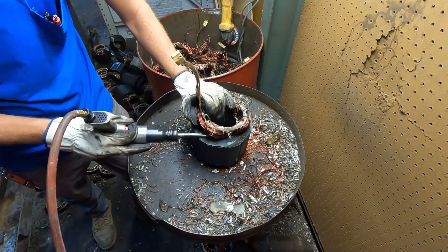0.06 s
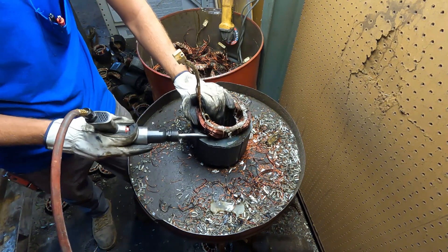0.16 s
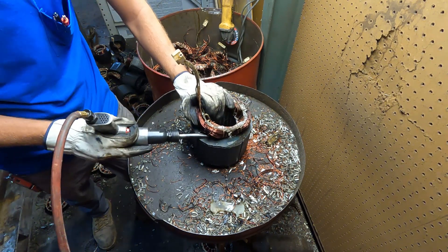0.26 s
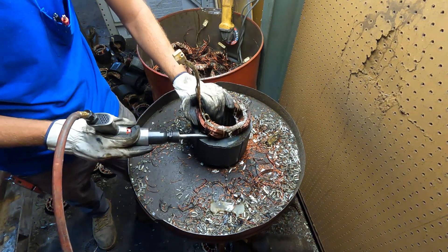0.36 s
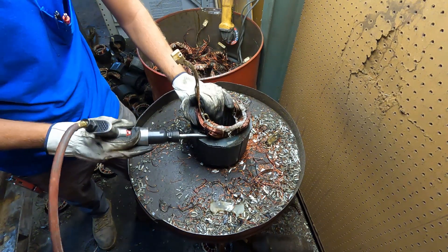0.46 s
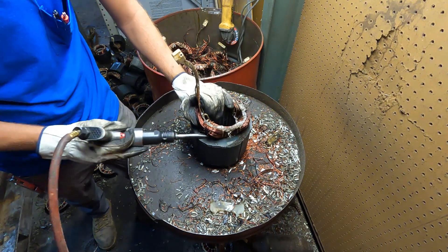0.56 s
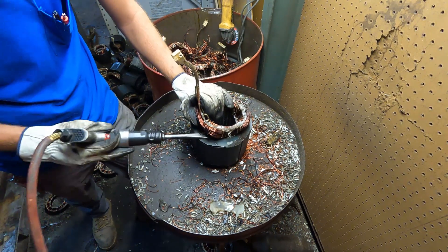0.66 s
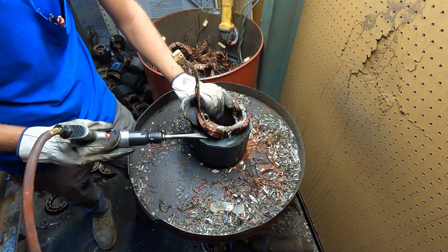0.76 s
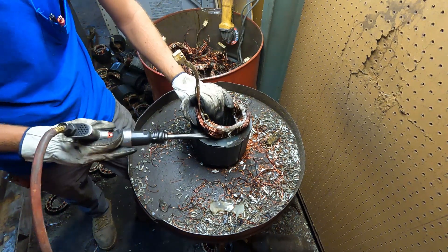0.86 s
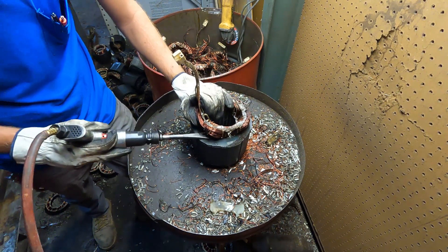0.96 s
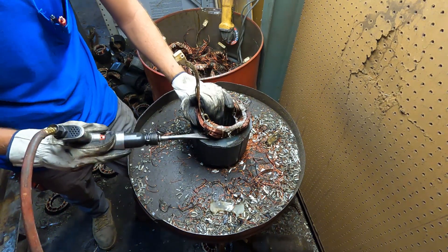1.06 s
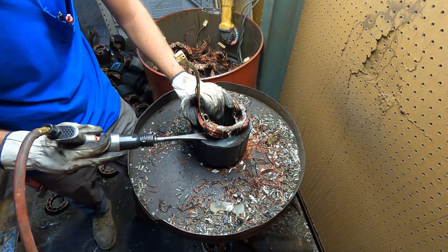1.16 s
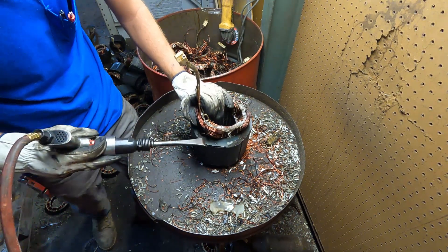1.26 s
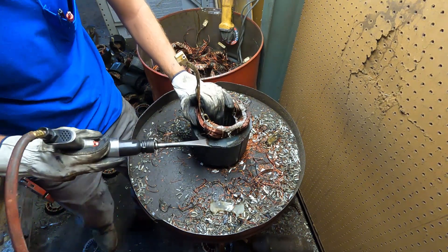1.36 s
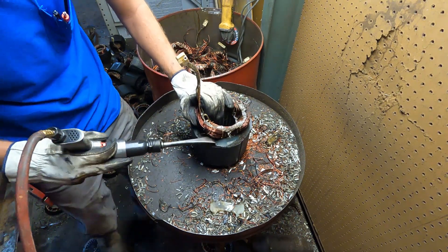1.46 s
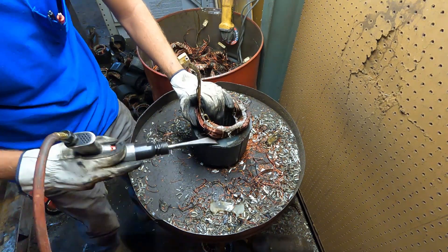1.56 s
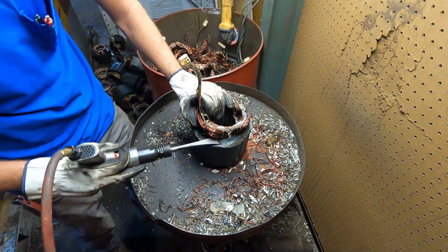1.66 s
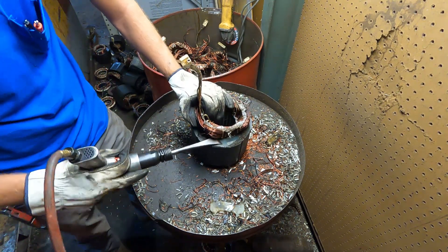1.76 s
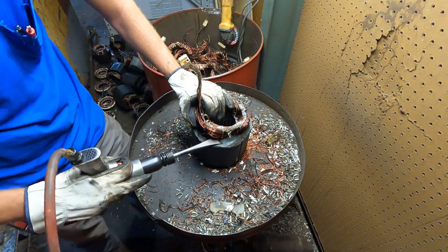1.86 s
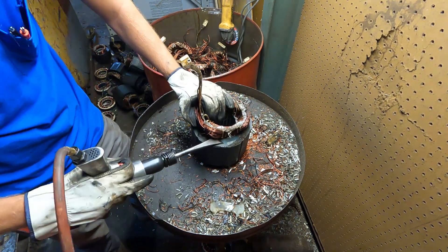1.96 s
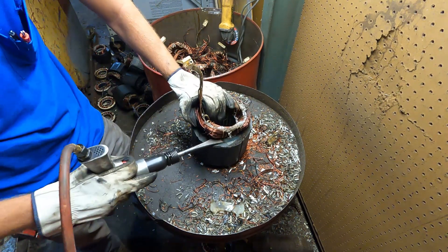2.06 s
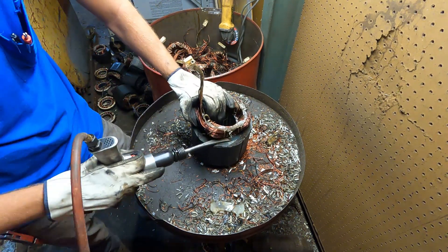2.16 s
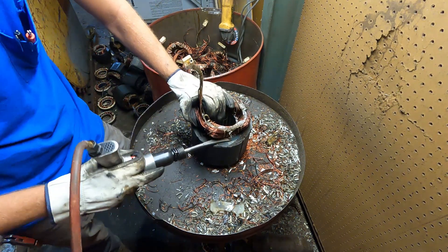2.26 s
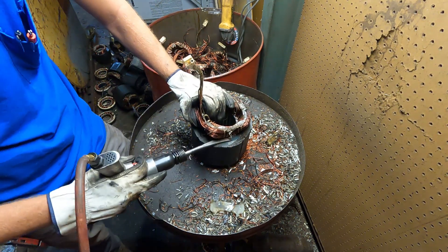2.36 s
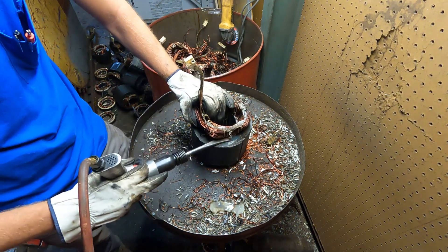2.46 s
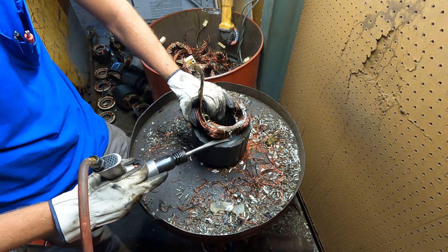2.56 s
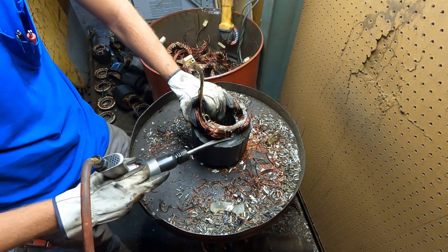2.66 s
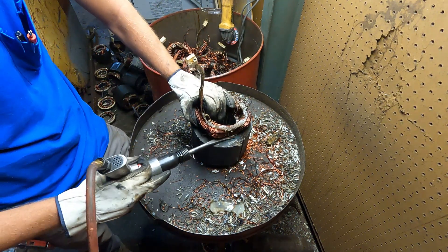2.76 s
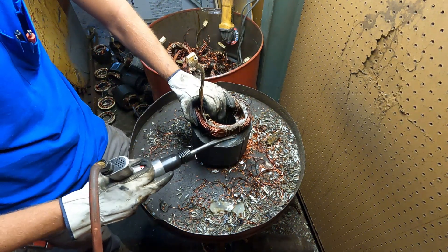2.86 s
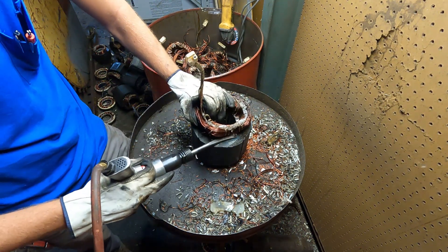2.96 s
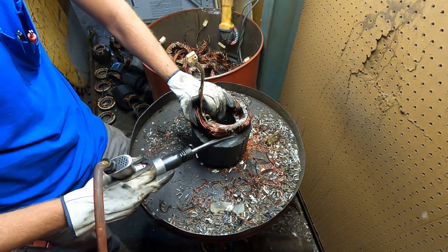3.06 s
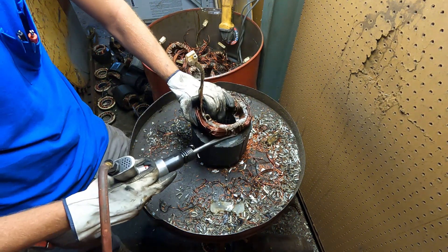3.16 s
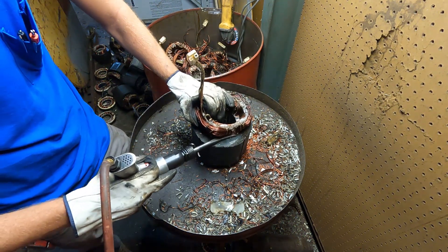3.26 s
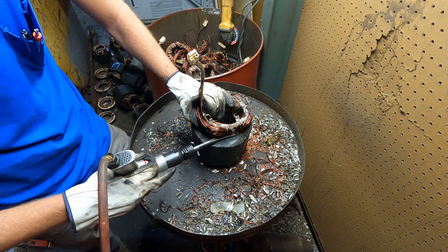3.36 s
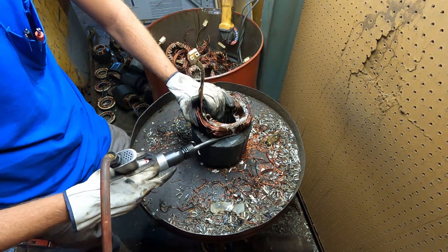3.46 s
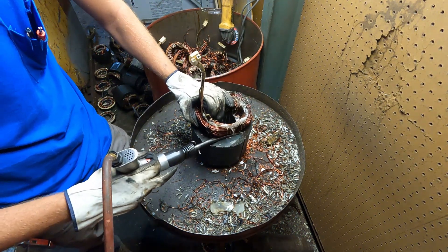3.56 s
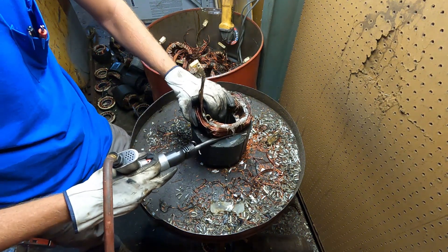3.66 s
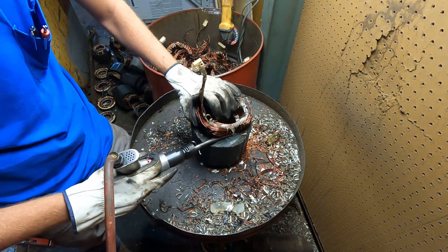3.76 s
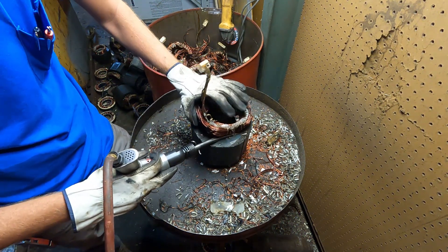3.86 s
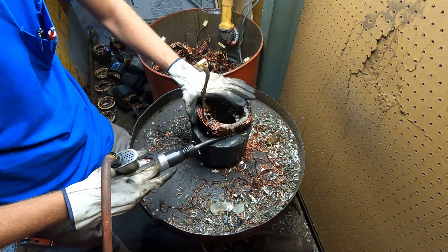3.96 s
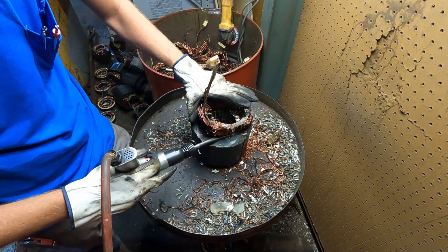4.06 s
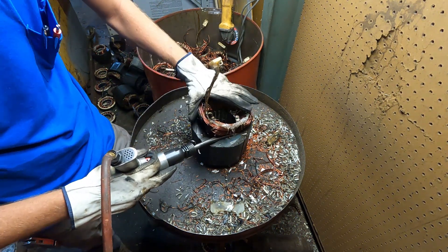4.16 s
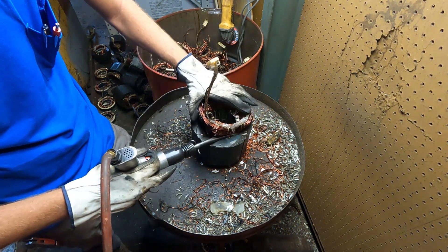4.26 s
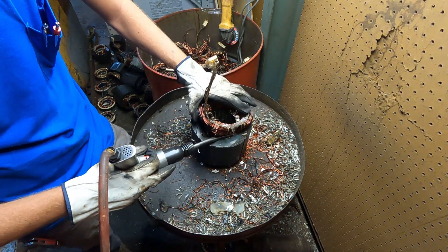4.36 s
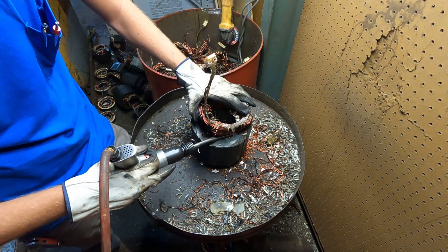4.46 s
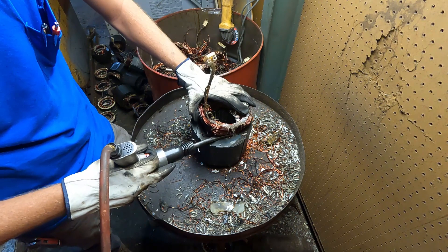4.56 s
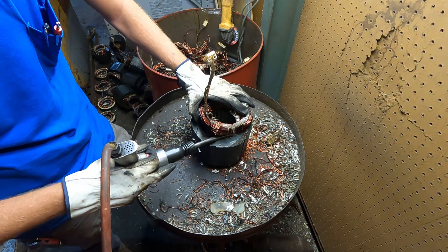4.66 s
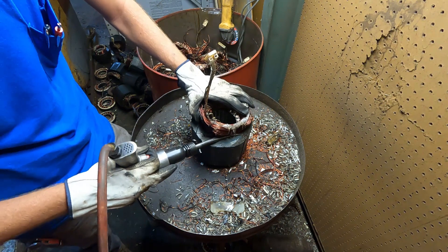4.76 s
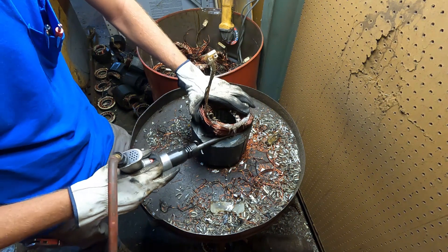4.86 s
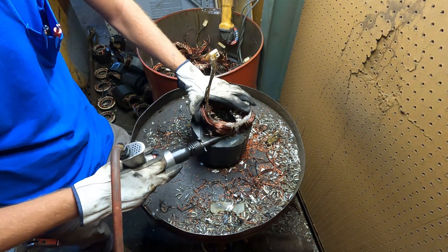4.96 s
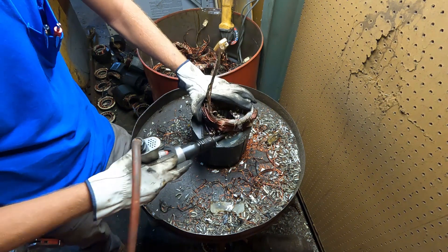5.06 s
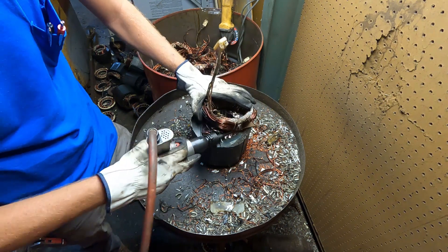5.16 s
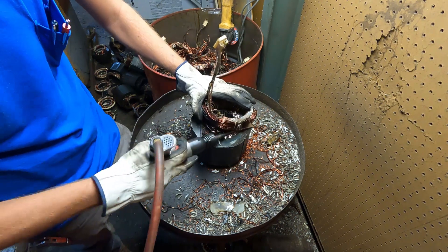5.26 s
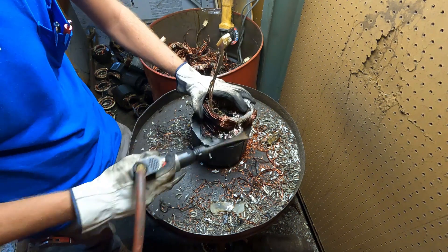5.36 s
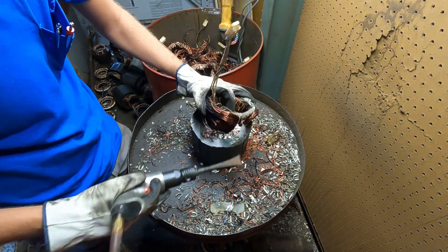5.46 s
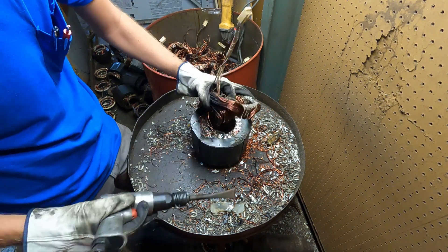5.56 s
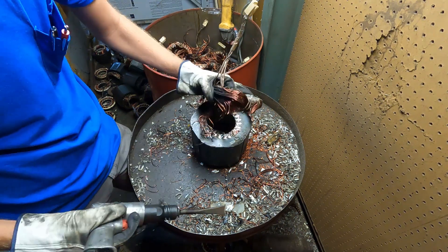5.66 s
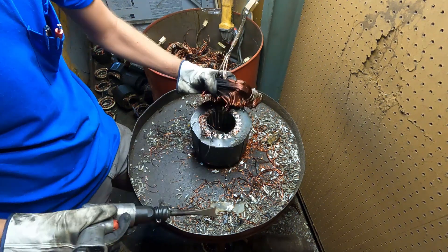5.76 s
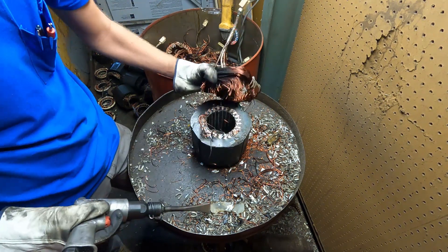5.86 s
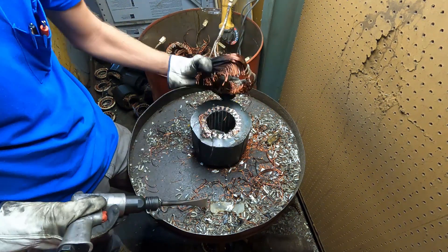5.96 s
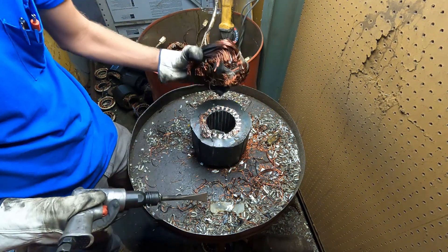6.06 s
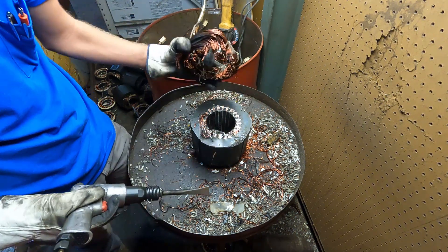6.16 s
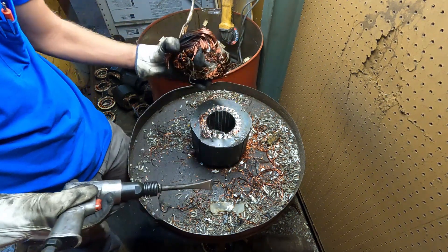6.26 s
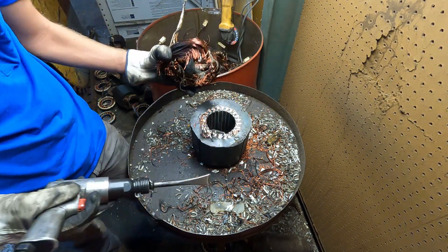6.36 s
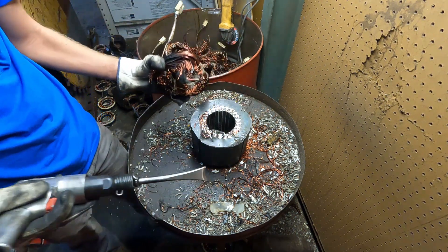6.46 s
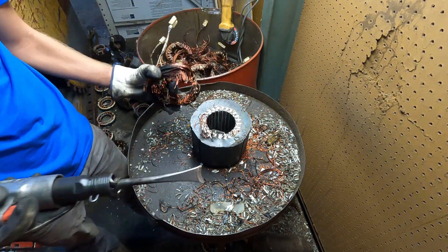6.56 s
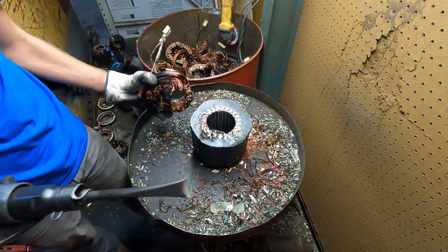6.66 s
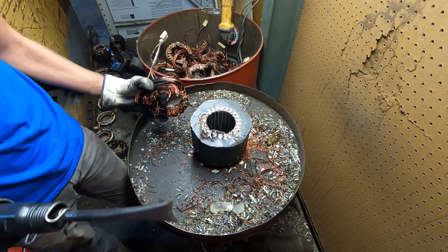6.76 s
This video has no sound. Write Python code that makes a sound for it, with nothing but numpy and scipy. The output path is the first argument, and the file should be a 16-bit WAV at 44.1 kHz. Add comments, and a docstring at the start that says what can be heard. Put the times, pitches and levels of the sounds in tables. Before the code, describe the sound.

A close, nearly mono sound in a reverberant scrap shop with faint machine hum and soft rush. From 0 to 0.5 s a pneumatic chisel hammers at about fifty strokes a second: low thumping puffs, sharp air hiss and steel clatter. A lone stroke follows at 0.6 s and the tray sings faintly. Scrapes come between 0.8 and 1.7 s, with a wire knock and clink near 1.7 s. At 2.1 s the tool stumbles, with a thin high valve whistle, a tiny burst and uneven single strokes to 2.5 s. The longest burst runs from 2.8 to 3.7 s, ending in two stray strokes. Light clinks and ticks fill 4.2 to 4.6 s. Another stuttering start leads into hammering from 4.8 to 5.3 s. Then wire scrapes and steel clinks until 6.1 s, and soft crunchy knocks on a metal bin around 6.3 to 6.7 s.

```python
"""Rapid hammering opens the scene: a pneumatic chisel cuts the copper winding off a motor's steel stator in four bursts.
The work lies on a steel tray in a scrap shop. Each stroke mixes a low puff, noise hiss and struck-metal modes;
lone strokes stumble as the trigger opens and closes. Between bursts the bit scrapes and clinks, from shaped noise
and decaying sines; at the end the winding is pulled out and bumps the bin. Machines hum in the room.
The sound is nearly mono, with a hall tail and a thin valve whistle, widest in the treble."""
import sys
import numpy as np
from scipy import signal
from scipy.fft import rfft, irfft, next_fast_len
from scipy.io import wavfile
from scipy.ndimage import map_coordinates

SR = 44100
rng = np.random.default_rng(int(sys.argv[2]) if len(sys.argv) > 2 else 0)


def waveform_to_disk(signal):
    """Save audio, clipped to [-1, 1], as 16-bit WAV at the path in sys.argv[1]."""
    frames = np.transpose(np.atleast_2d(signal))
    scaled = np.clip(frames, -1, 1) * 32767
    samples = np.round(scaled).astype(np.int16)
    wavfile.write(sys.argv[1], SR, samples)


N = 299880  # samples, 6.8 s

# All levels are relative, ahead of the mix gains in the functions, unless given as rms.
# Distant motors and mains. Each row: frequency in Hz, level in dB rms.
MACHINE_HUM = [(49.5, -55), (59, -60), (119, -57.5)]
# Soft rush of the shop. Each row: frequency in Hz, density in dB per Hz.
SHOP_RUSH = [(12, -35), (20, -12), (80, -4), (235, -19), (445, -23.5), (497, -30.5), (620, -33), (914, -61),
             (994, -38), (1680, -34), (2550, -43.5), (3000, -30), (3760, -38.5), (9110, -57.5),
             (15000, -80)]
# Decay of the hall. Each row: frequency in Hz, time to fall 60 dB in s.
HALL_DECAY = [(60, 0.66), (200, 0.51), (500, 0.74), (2000, 0.76), (5000, 0.71), (8000, 0.65), (14000, 0.46)]
# Faint side level by frequency, widest in the treble. Each row: frequency in Hz, side level in dB.
SIDE_LEVEL = [(100, -38), (500, -27), (1200, -19), (5000, -13), (10000, -5), (13000, 2), (15000, 3)]
# Spent air swirling past the microphone. Each row: start in seconds, end in seconds, level in dB.
AIR_GUSTS = [(.02, 0.528, -24), (2.184, 2.344, -23), (2.785, 3.685, -24), (4.8, 5.314, -22)]
# Colour of that air. Each row: frequency in Hz, density in dB per Hz.
GUST_COLOUR = [(12, -12.5), (30, -4), (70, -2), (150, -7), (350, -10), (600, -17), (1200, -86)]
# Air whistling in the throttle valve. Each row: start in seconds, end in seconds, level in dB.
VALVE_WHISTLES = [(2.162, 2.267, -37.5), (4.804, 5.05, -44.5)]
# Colour of the whistle. Each row: frequency in Hz, density in dB per Hz.
WHISTLE_COLOUR = [(9000, -70), (12000, -8.5), (14600, -15.0), (15150, -4.5), (15700, -19.0), (17000, -22.0)]
# Chips and wire ends ticking during handling. Each row: start in seconds, end in seconds, level in dB.
HANDLING_SPELLS = [(1.851, 2.08, -53.5), (4.012, 4.603, -48), (5.457, 6.194, -50)]
# Steel and wire dragging. Each row: peak time in seconds, rise and fall time constants in seconds,
# scratch level in dB, tray rumble level in dB.
DRAG_STROKES = [(.77, 0.064, 0.032, -39, -57), (1.08, 0.18, 0.042, -55.5, -54.5),
                (1.342, 0.043, 0.017, -41, -79), (1.725, 0.038, 0.023, -32, -31),
                (4.153, .025, 0.021, -44.5, -58), (4.45, 0.36, 0.22, -52.5, -64),
                (5.54, 0.15, 0.047, -37, -47), (5.8, 0.14, 0.2, -49.5, -72),
                (6.13, 0.044, 0.038, -52.5, -66), (6.45, 0.043, 0.074, -52, -41)]
# Scratch of steel and wire. Each row: frequency in Hz, density in dB per Hz.
SCRATCH_COLOUR = [(470, -50), (800, -4.5), (882, -10), (1370, -7.5), (2240, 1), (3120, -1), (4140, 1.5),
                  (5690, -2), (10300, -17.5), (15000, -33)]
# Rumble of the tray under a drag. Each row: frequency in Hz, density in dB per Hz.
RUMBLE_COLOUR = [(120, -18), (300, 8.5), (560, 15.5), (800, 1), (1500, 3.0), (3000, -38)]
# The winding bumping tray and bin. Each row: start in seconds, level in dB, thud in dB against that level.
WINDING_KNOCKS = [(1.6528, -46, -10), (1.7392, -26.5, -28), (6.3244, -56, 6.5), (6.4059, -30, -20),
                  (6.4517, -38, -9.5), (6.499, -33.5, -18), (6.557, -39.5, -14), (6.6588, -54.5, -14)]
# Crunch of the wire bundle. Each row: frequency in Hz, density in dB per Hz.
CRUNCH_COLOUR = [(410, -27), (700, -1), (753, 2.5), (1530, -14.5), (1820, -4.5), (4430, -15), (5010, -37.5),
                 (10400, -30), (13000, -60)]
# The bin's rim. Each row: frequency in Hz, level in dB, time to fall 60 dB in s.
BIN_RIM_MODES = [(1390, -11, .06), (1830, -0.5, .07), (1997, -7, .09), (3020, -6, .11), (3950, -13, .08),
                 (4404, -6, .1), (6100, -14, .09), (7570, -16, .08)]
# The tray. Each row: frequency in Hz, level in dB, time to fall 60 dB in s.
TRAY_MODES = [(163, 7, 0.34), (239, -1, 0.22), (345.2, 2, 0.39), (461, -7.5, 0.32), (574, -3, 0.2),
              (676, -11, 0.11), (790, -12, .12)]
# Bit and loose steel touching. Each row: start in seconds, level in dB, dull clack in dB against that level.
STEEL_CLINKS = [(.7764, -36, -25), (1.7155, -32, 1.5), (1.9096, -44, -8), (4.2546, -25, -5.5),
                (4.37, -37.5, -8), (4.444, -38.5, -8), (5.571, -28, -27), (5.6682, -36, -33.5),
                (5.725, -38.5, -15), (5.774, -45, -15), (5.818, -35.5, -25), (5.9131, -28, -16),
                (6.0642, -36.5, -30)]
# Colours of the bright tick and the dull clack. Each row: frequency in Hz, density in dB per Hz.
TICK_COLOUR = [(1000, -24), (2000, -5.5), (3500, -1.5), (5800, 2.5), (7000, -3), (10000, -18.5), (15000, -30)]
CLACK_COLOUR = [(850, -17.0), (1200, 13.5), (2500, 7.5), (4000, -36.5)]
# The stator's teeth and the free bit. Each row: frequency in Hz, level in dB, time to fall 60 dB in s.
FREE_BIT_MODES = [(1184, -10, 0.054), (2027, -6.5, .08), (2410, -8.5, .07), (2890, -5.5, .08),
                  (3830, -5.5, 0.11), (4597, -4, 0.14), (4960, -12, .08), (5210, -8, .08),
                  (5600, -3.5, 0.066), (6100, -3.5, 0.08), (7101, -6, 0.12), (7935, -14, .06)]
# Lone strokes on a half-open trigger. Each row: time in seconds, level in dB,
# then puff, clank and ring in dB against that level.
LONE_STROKES = [(.5894, -21, -5, -7, -10.5), (2.119, -22.5, 0, -34, -17), (2.143, -12.5, 1.5, 1.5, -29),
                (2.1627, -14, -2, -4, -25), (2.3408, -23.5, 0, -8, -21), (2.384, -16.5, 1.5, 3, -11),
                (2.4312, -14, -1.5, -13, -19), (2.4853, -18.5, -8, -37, -36), (2.708, -28.5, 8, -10, -22),
                (2.725, -18.5, -3.5, -8, -21), (2.7418, -15, 0, -21, -15), (2.7584, -16, -3, -18, -13),
                (3.7173, -18.5, 7.5, -7, -14), (3.7673, -22.5, -12, -10, -14),
                (4.7131, -37, 11.5, -12, -3.5), (4.732, -23.5, -2, -31, -1), (4.7534, -15.5, 4, -4, -5.5),
                (4.7721, -13.5, -7, -43, -10), (5.2964, -12.5, -7.5, -8, -15), (5.3578, -20, -5, -8, -32)]
# Slow venting of a lone stroke. Each row: frequency in Hz, density in dB per Hz.
CHUFF_COLOUR = [(30, 1.5), (70, 2), (130, 4), (200, -5.5), (340, -2), (600, -8), (850, -13), (1300, -21.5),
                (3000, -51)]
# The bit's bending modes. Each row: frequency in Hz, level in dB, time to fall 60 dB in s.
SHANK_MODES = [(2033, 5, 0.055), (2166, -4.5, 0.2), (2060, -28, 0.073), (3260, -9, .06), (5550, -7.5, 0.06)]
# Rhythm of each burst. Each row: first stroke in seconds, number of strokes, period in seconds,
# slowing in seconds per stroke, time lost in running up in seconds.
BURST_RHYTHM = [(.0104, 26, .0193, 34e-6, .017), (2.1819, 6, .022, 0, 0), (2.7725, 47, .01945, 21e-6, 0),
                (4.7915, 25, .01942, 47e-6, 0)]
RUN_UP_STROKES = 3
# Force of each burst. Each row: exhaust puff, steel blow, air hiss, stator clank, recoil and tray boom in dB,
# opening surge in dB, time constant of the surge in seconds.
BURST_FORCE = [(-13.5, -30, -27.5, -29.5, -13.5, -26.5, 2.5, 0.039),
               (-16, -29.5, -28.5, -34, -15, -22.5, 6, 0.046),
               (-12.5, -29.5, -30.5, -32.5, -15, -34.5, 1.5, 0.073),
               (-13.5, -30, -29, -30.5, -13.5, -28, 3.5, 0.27)]
# One exhaust puff. Each row: frequency in Hz, level in dB.
PUFF_SPECTRUM = [(40, -20), (100, -4), (200, -6), (250, -2), (325, 2), (410, -5), (560, -5), (680, -14.5),
                 (780, -17.5), (900, -21), (1200, -28.5), (2500, -44), (6000, -71.5)]
# The tool's recoil in the gloved hand. Each row: frequency in Hz, level in dB.
RECOIL_SPECTRUM = [(20, -16), (50, -11.5), (80, -8), (102, 1.5), (150, -4), (200, -10), (400, -38),
                   (1500, -83.5)]
# The edge on the copper. Each row: frequency in Hz, density in dB per Hz.
CRACK_COLOUR = [(600, -27.5), (1300, -9.5), (2000, 14), (3100, -8), (3800, -16), (6000, 3), (9000, -8),
                (15000, -59)]
# Escaping air. Each row: frequency in Hz, density in dB per Hz.
HISS_COLOUR = [(500, -13), (1300, -3), (3000, 3.5), (3900, -1), (5000, 1), (7800, 0), (9000, -8),
               (10500, -9), (13000, -21.5), (14200, -29), (15500, -48.5)]
# Chisel and stator ringing together. Each row: frequency in Hz, level in dB, time to fall 60 dB in s.
STEEL_MODES = [(1980, 12.5, 0.044), (1847, -27, 0.19), (2078, -6.5, 0.39), (2170, -11, 0.073),
               (2400, -12, 0.037), (2900, -14, 0.12), (3130, 1, 0.099), (7200, -28, 0.086),
               (8300, -23, .06)]
# Dense ringing of the chisel. Each row: frequency in Hz, level in dB.
CHISEL_CLANG = [(600, -38), (1100, -2.5), (1400, -1), (1750, 1.5), (2080, -0.5), (2400, -1.5), (3050, -1.5),
                (3800, -6), (6000, -9.5), (9000, -25.5), (15000, -49)]
# Dense ringing of the stator stack. Each row: frequency in Hz, level in dB.
STATOR_CLANK = [(450, -2), (660, -0.5), (760, 0), (870, 2), (1000, -4), (1130, -1), (1250, -10),
                (1700, -43), (3000, -46)]
# The tray's drumming, damped by the stator pressed on it. Each row: frequency in Hz, level in dB.
TRAY_BOOM = [(90, -25), (140, -7), (175, 9), (230, -4), (350, 8), (480, -9.5), (800, -19), (1200, -35),
             (3000, -62)]
TICKS_PER_S = 13
TOP_HZ = 15750  # upper band limit


def amp(db):
    """Decibels to gain."""
    return 10 ** (np.asarray(db) / 20)


def unit(x):
    """Scale to rms 1."""
    return x / np.sqrt(np.mean(x ** 2) + 1e-20)


def along(points, hz):
    """Interpolate (Hz, value) points on a log frequency axis."""
    f, v = np.transpose(points)
    return np.interp(np.log(hz + 1), np.log(f + 1), v)


def wobble(rate):
    """A smooth random curve, rate knots a second."""
    knots = rng.standard_normal(int(N * rate / SR) + 4)
    return map_coordinates(knots, [np.arange(N) * rate / SR])


def filtered(x, response):
    """Multiply the spectrum of x by a response of frequency."""
    m = next_fast_len(N + SR // 2)
    return irfft(rfft(x, m) * response(np.fft.rfftfreq(m, 1 / SR)), m)[..., :N]


def noise(spectrum):
    """Coloured noise of rms 1."""
    return unit(filtered(rng.standard_normal(N), lambda hz: amp(along(spectrum, hz))))


def pulse(spectrum, size=8192):
    """The causal minimum-phase pulse with this spectrum, of peak 1."""
    cepstrum = irfft(np.log(amp(along(spectrum, np.fft.rfftfreq(size, 1 / SR)))))
    # Folding the cepstrum forward in time puts the energy at the start.
    cepstrum[1:size // 2] *= 2
    cepstrum[size // 2 + 1:] = 0
    shape = irfft(np.exp(rfft(cepstrum)))
    return shape / np.abs(shape).max()


def add(track, s, sound):
    """Mix a sound in at time s."""
    i = int(np.clip(round(s * SR), 0, N - 1))
    track[i:i + len(sound)] += sound[:N - i]


def hits(times, sizes, shape):
    """One copy of the shape for each time and size."""
    track = np.zeros(N)
    for s, size in zip(times, sizes):
        add(track, s, size * shape)
    return track


def swell(rise, t60):
    """An envelope of peak 1 that rises and dies away, both in seconds."""
    t = np.arange(SR // 3) / SR
    shape = (1 - np.exp(-t / rise)) * amp(-60 * t / t60)
    return shape / shape.max()


def held(start, end, fade):
    """A gate that is open from start to end, with short ramps outside."""
    now = np.arange(N) / SR
    return np.clip(1 + np.minimum(now - start, end - now) / fade, 0, 1)


def ringing(times, sizes, modes, scatter_db, detune):
    """Each contact lands on a new spot and wakes the modes with new strengths, signs and slightly new pitches."""
    hz, db, t60 = np.transpose(modes)[:, :, None]
    t = np.arange(int(t60.max() * SR)) / SR
    track = np.zeros(N)
    fades = amp(db - 60 * t / t60) * (1 - np.exp(-t / .001))
    for s, size in zip(times, sizes):
        strength, sign, shift = rng.standard_normal((3, len(modes), 1))
        waves = fades * np.sin(2 * np.pi * hz * (1 + detune * shift) * t)
        gains = amp(scatter_db * strength) * np.sign(sign)
        add(track, s, size * np.sum(gains * waves, axis=0))
    return track


def drifting(x, responses, rate):
    """Pass x through a response that glides from one to the next, rate times a second."""
    count = len(responses)
    place = (np.arange(N) / SR * rate - np.arange(count)[:, None]) % count
    # Equal-power crossfade: each response takes a half-sine share of the input.
    shares = np.sin(np.pi / 2 * place, out=np.zeros_like(place), where=place < 2)
    return signal.oaconvolve(x * shares, responses, axes=1)[:, :N].sum(0)


def clang(times, sizes, spectrum, t60, rate, count=5):
    """Dense steel modes answer alike from blow to blow, changing as the bit works in."""
    shape = swell(rise=.0005, t60=t60)
    responses = noise(spectrum)[:count * len(shape)].reshape(count, -1) * shape
    return drifting(hits(times, sizes, np.ones(1)), responses, rate)


def puffs(times, sizes, size=2048):
    """The port opens and shuts smoothly, so each puff is a rounded push centred on its time."""
    spectrum = amp(along(PUFF_SPECTRUM, np.fft.rfftfreq(size, 1 / SR)))
    shape = np.fft.fftshift(irfft(spectrum)) * np.hanning(size)
    return signal.fftconvolve(hits(times, sizes, np.ones(1)), shape / shape.max(), mode="same")


def shop():
    """Distant machines: sines with wavering phase make a hum over a soft rush of noise."""
    t = np.arange(N) / SR
    hum = 0
    for hz, db in MACHINE_HUM:
        hum = hum + amp(db) * np.sqrt(2) * np.sin(2 * np.pi * hz * t + .5 * wobble(rate=3.7))
    return hum + amp(-51.0 + wobble(rate=2.41)) * noise(SHOP_RUSH)


def room(x, wet_db, count=4):
    """The hall's tail is decaying noise; it changes as the worker and tool move."""
    hz, t, z = signal.stft(rng.standard_normal((count, SR)), SR, nperseg=256)
    decay = amp(-60 * t / along(HALL_DECAY, hz)[:, None])
    build_up = 1 - np.exp(-t / 0.013)
    tails = signal.istft(z * decay * build_up, SR, nperseg=256)[1]
    tails = tails / np.linalg.norm(tails, axis=1, keepdims=True)
    x = filtered(x, lambda hz: hz / np.hypot(hz, 160))  # the tail carries little bass
    return amp(wet_db) * drifting(x, tails, rate=4)


def gusts():
    """The spent air swirls past the microphone while the tool runs: gated low noise."""
    flow = sum(amp(db) * held(start, end, fade=0.013) for start, end, db in AIR_GUSTS)
    return flow * noise(GUST_COLOUR)


def valve():
    """A narrow, very high whistle while the throttle is part open, from separate noise left and right."""
    opening = sum(amp(db) * held(start, end, fade=0.042) for start, end, db in VALVE_WHISTLES)
    return amp(3) * opening * np.array([noise(WHISTLE_COLOUR), noise(WHISTLE_COLOUR)])


def tray_note(start=0.56, hz=555, db=-43, t60=1.85):
    """The tray sings on after the first burst as one decaying sine."""
    t = np.arange(2 * SR) / SR
    track = np.zeros(N)
    fade = amp(db - 60 * t / t60) * (1 - np.exp(-t / 0.011))
    add(track, start, fade * np.sin(2 * np.pi * hz * t))
    return track


def ticks():
    """Chips and wire ends tick against the stator at random moments."""
    times, sizes = [], []
    for start, end, db in HANDLING_SPELLS:
        count = round(TICKS_PER_S * (end - start))
        times.extend(rng.uniform(start, end, count))
        sizes.extend(amp(db + 2 * rng.standard_normal(count)))
    tick = amp(-6.5) * hits(times, sizes, swell(rise=.002, t60=0.048)) * noise(SCRATCH_COLOUR)
    return tick + amp(-18) * ringing(times, sizes, FREE_BIT_MODES, scatter_db=2.5, detune=.015)


def drags():
    """Each drag swells and dies away; sticking and slipping makes a grainy scratch and shakes the tray."""
    now = np.arange(N) / SR
    scratch, rumble = 0, 0
    for s, rise, fall, scratch_db, rumble_db in DRAG_STROKES:
        speed = np.exp(-np.maximum((s - now) / rise, (now - s) / fall))
        scratch = scratch + amp(scratch_db) * speed
        rumble = rumble + amp(rumble_db) * speed
    slips = unit(amp(0.96 * wobble(rate=78) + 1.6 * wobble(rate=410)))
    scraping = amp(-4.5) * scratch * noise(SCRATCH_COLOUR)
    shaking = amp(-7) * rumble * noise(RUMBLE_COLOUR)
    return slips * (scraping + shaking)


def knocks():
    """The soft bundle of wire crunches and thuds on sheet steel, waking rim and tray modes."""
    times, db, thud_db = np.transpose(WINDING_KNOCKS)
    crunch = amp(-13) * hits(times, amp(db), swell(rise=.003, t60=0.12)) * noise(CRUNCH_COLOUR)
    rim = amp(-14) * ringing(times, amp(db), BIN_RIM_MODES, scatter_db=3, detune=.008)
    thud = amp(-1.5) * ringing(times, amp(db + thud_db), TRAY_MODES, scatter_db=3.5, detune=0.039)
    return crunch + rim + thud


def clinks():
    """Light steel contacts: a bright tick, a duller clack and a short ring."""
    times, db, clack_db = np.transpose(STEEL_CLINKS)
    touch = swell(rise=.003, t60=.04)
    tick = amp(-9.0) * hits(times - .001, amp(db), touch) * noise(TICK_COLOUR)
    clack = amp(-5) * hits(times - .001, amp(db + clack_db), touch) * noise(CLACK_COLOUR)
    ring = amp(-14) * ringing(times, amp(db), FREE_BIT_MODES, scatter_db=3, detune=.02)
    return tick + clack + ring


def stumbles():
    """With little air the piston makes lone strokes: it vents slowly and the loose bit clanks and rings."""
    times, db, puff_db, clank_db, ring_db = np.transpose(LONE_STROKES)
    vent = amp(db + puff_db)
    exhaust = puffs(times + 0.0034, vent)
    chuff = amp(-5) * hits(times - .002, vent, swell(rise=0.0046, t60=0.16)) * noise(CHUFF_COLOUR)
    clank = amp(-9) * hits(times, amp(db + clank_db), swell(rise=0.0016, t60=0.15)) * noise(STATOR_CLANK)
    ring = amp(-2) * ringing(times, amp(db + ring_db), SHANK_MODES, scatter_db=1.5, detune=.004)
    air_colour = amp(-11.5) * noise(HISS_COLOUR) + amp(-17.5) * noise(CHISEL_CLANG)
    air = hits(times - .002, amp(db), swell(rise=.008, t60=.07)) * air_colour
    return exhaust + chuff + clank + ring + air


def strokes(jitter, scatter_db, bite_db):
    """Time and strength of each part of every stroke: a burst opens with a surge, and its period may lengthen."""
    times, levels = [], []
    for (start, count, period, slowing, lag), (*db, surge_db, surge_s) in zip(BURST_RHYTHM, BURST_FORCE):
        k = np.arange(count)
        age = period * k + slowing * k ** 2 / 2 + lag * np.tanh(k / RUN_UP_STROKES)
        times.append(start + age)
        levels.append(np.add.outer(db, surge_db * np.exp(-age / surge_s)))
    times = np.concatenate(times)
    slip, vent, bite, spray = rng.standard_normal((len(times), 4)).T
    vent, bite, spray = scatter_db * vent, bite_db * bite, scatter_db * spray
    # Puff and recoil vary together; so do blow, clank and boom.
    sizes = amp(np.hstack(levels) + [vent, bite, spray, bite, vent, bite])
    return times + jitter * slip, *sizes


def chisel(rebound_jitter=0.00024, grip_db=0.45):
    """The tool kicks, the piston strikes the bit, then uncovers the port: a puff with a burst of hiss."""
    times, puff, blow, hiss, clank, kick, boom = strokes(jitter=.00007, scatter_db=1, bite_db=2.8)
    driven, struck, shut = times - .0055, times - .003, times + .0044
    # The stator hops unevenly.
    rebound = times + 0.002083 + rebound_jitter * rng.standard_normal(len(times))

    recoil = amp(2.5 + grip_db * wobble(rate=6)) * hits(driven, kick, pulse(RECOIL_SPECTRUM))
    # The closing port leaves a suction.
    exhaust = amp(7.5) * puffs(times, puff) - amp(-9) * puffs(shut, puff)
    # The edge skids on the copper.
    chatter = amp(-6.0) * hits(struck, blow, swell(rise=0.00018, t60=0.068)) * noise(CRACK_COLOUR)
    ring = amp(2.5) * clang(struck, blow, CHISEL_CLANG, t60=0.11, rate=4)
    ring += amp(-6.0) * ringing(struck, blow, STEEL_MODES, scatter_db=4.0, detune=0.0048)
    stator = amp(3.0) * clang(rebound, clank, STATOR_CLANK, t60=0.1, rate=3.958)
    tray = amp(4.5) * clang(times, boom, TRAY_BOOM, t60=0.072, rate=4)

    # Air leaks throughout each burst and spurts at every stroke.
    bursts = np.split(times, np.cumsum([row[1] for row in BURST_RHYTHM])[:-1])
    running = sum(held(s[0], s[-1], fade=0.075) for s in bursts)
    leak = running * np.interp(np.arange(N) / SR, times, hiss)
    spurts = hits(times - .002, hiss, swell(rise=0.0013, t60=0.025))
    air = (amp(-5.0) * spurts + amp(-2.0) * leak) * noise(HISS_COLOUR)
    return recoil + exhaust + chatter + ring + stator + tray + air


def scene():
    """Tool and scrap in the hall, nearly mono except in the highest treble."""
    tool = chisel() + stumbles() + gusts()
    scrap = clinks() + knocks() + drags() + ticks()
    hall = room(tool, wet_db=-11.5) + room(scrap, wet_db=-13.5)
    mid = tool + scrap + hall + tray_note() + shop()
    spread = room(tool + scrap, wet_db=-29.5, count=2)
    side = filtered(spread, lambda hz: amp(along(SIDE_LEVEL, hz)))
    return np.array([mid + side, mid - side]) + valve()


def record(dry):
    """Both channels fade out over the last 150 Hz below the band limit and keep nothing above it."""
    return filtered(dry, lambda hz: np.clip((TOP_HZ - hz) / 150, 0, 1))


dry = scene()
out = record(dry)
waveform_to_disk(out)
```